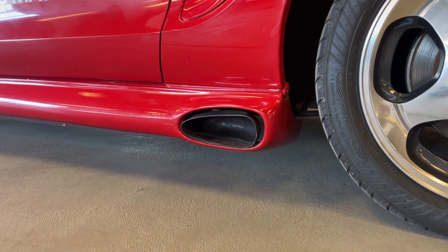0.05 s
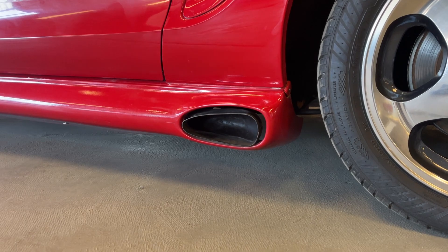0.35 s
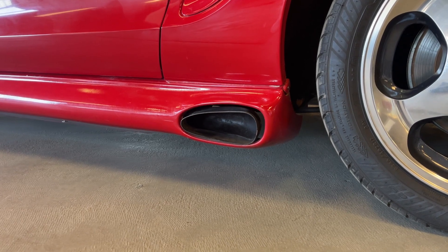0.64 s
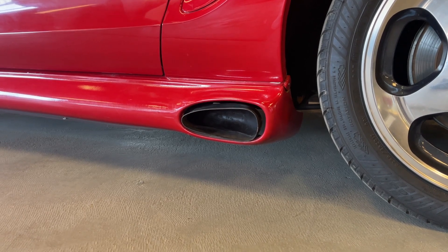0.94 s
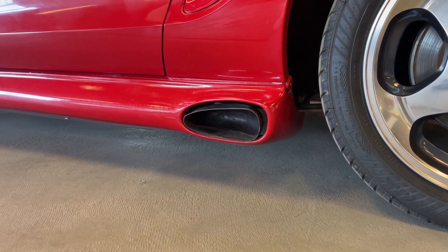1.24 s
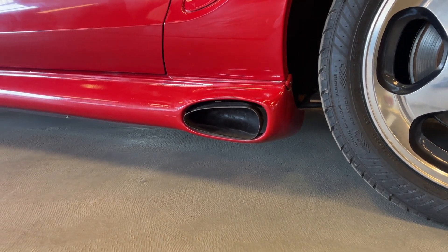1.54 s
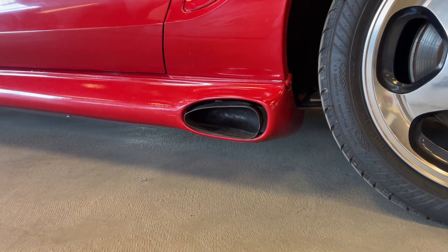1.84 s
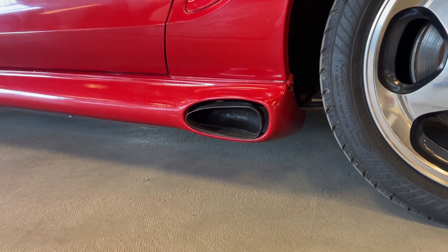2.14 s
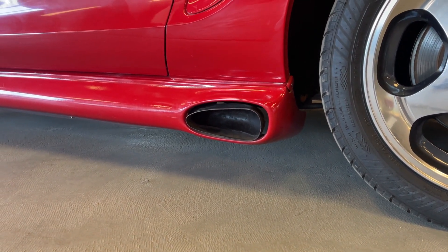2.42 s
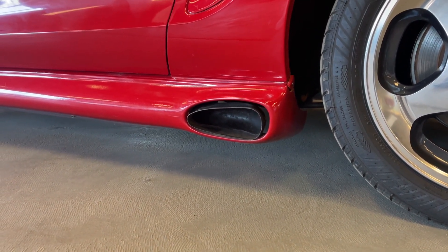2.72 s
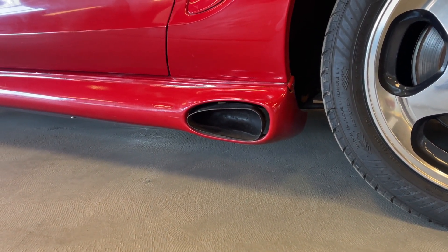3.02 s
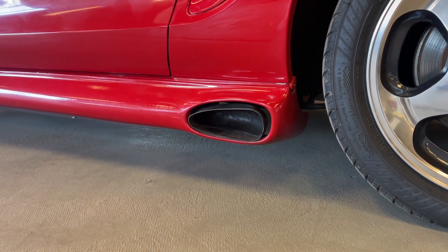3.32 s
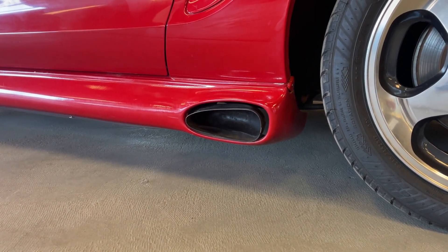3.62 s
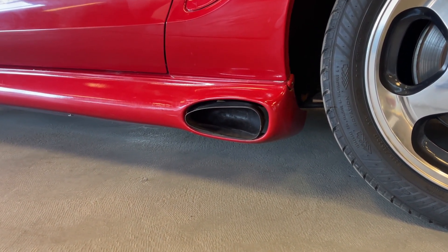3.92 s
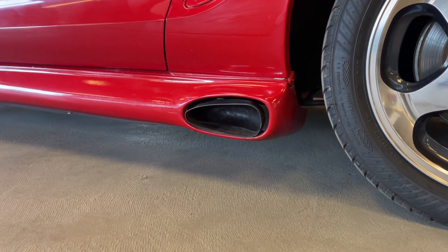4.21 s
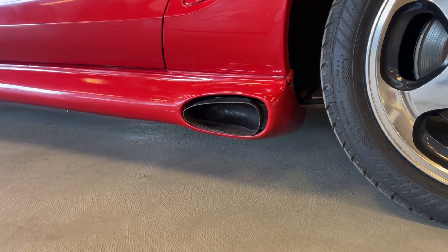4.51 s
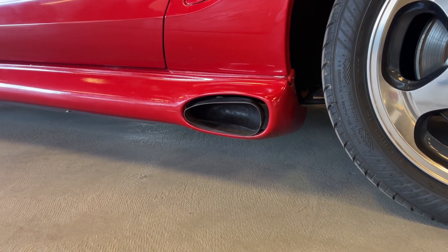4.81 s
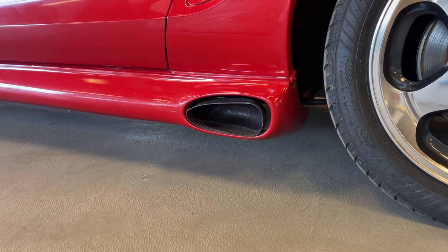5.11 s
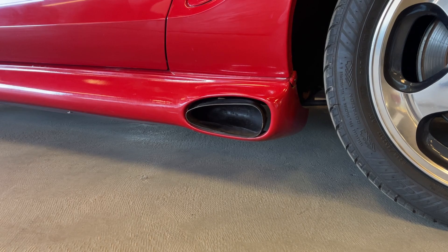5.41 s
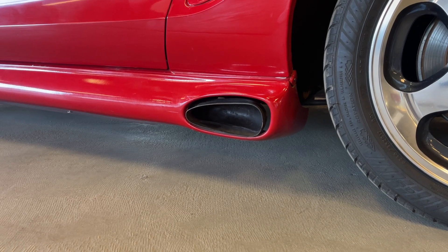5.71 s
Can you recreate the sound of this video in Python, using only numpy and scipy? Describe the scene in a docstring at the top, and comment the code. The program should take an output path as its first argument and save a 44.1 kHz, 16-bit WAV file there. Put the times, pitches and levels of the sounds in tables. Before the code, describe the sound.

An eight-cylinder car engine idles for the whole six seconds, heard close to the side exhaust outlet in a concrete garage. The main sound is a deep, booming burble with an uneven, loping beat, each firing pushing a soft puff of gas through the ringing pipe. The speed wanders only slightly, sagging a little just after 4 seconds and recovering by 5.

Short hollow burps dot the rumble throughout. Late firings add small breathy chuffs at about 0.3, 0.6 and 0.9 seconds, then at 4.3 and 4.6, with the strongest around 5.2 and another at 5.6. A slight dry rasp pulses with the engine and stands out briefly near 2.1 and 5.4 seconds. Well behind the exhaust, the engine bay gives a steady, wide hiss, with light rhythmic valve ticking and rustling and a very faint, high pump whine.

```python
"""Eight-cylinder idle in a concrete garage

Close to the side exhaust outlet, uneven firings make the pipe boom and burble, each with a puff of gas.
Now and then one burns late and chuffs or burps. The lope comes from the unequal cylinders.
Behind it the engine bay hisses, the valves tick and rustle and a pump whines faintly."""
import sys
import numpy as np
from scipy import signal
from scipy.fft import rfft, irfft
from scipy.io import wavfile
from scipy.ndimage import uniform_filter1d

SR = 44100
rng = np.random.default_rng(int(sys.argv[2]) if len(sys.argv) > 2 else 0)


def transcribe(signal):
    """Save signal, clipped to [-1, 1], as a 16-bit WAV file at the path in sys.argv[1]."""
    frames = np.atleast_2d(signal).T
    limited = np.clip(frames, -1, 1)
    pcm = np.round(limited * 32767).astype(np.int16)
    wavfile.write(sys.argv[1], SR, pcm)


N = 262395
TIME = np.arange(N) / SR
HZ = np.maximum(np.arange(N // 2 + 1) * SR / N, 1e-3)

# the idle hunting slowly around its set speed: time_s, crank_rpm
IDLE_SPEED = [(0.0, 786.5), (0.21, 776.9), (0.41, 775.4), (0.62, 778), (0.82, 781.9), (1.03, 767.9),
              (1.23, 771), (1.44, 772.8), (1.64, 800), (1.85, 781.9), (2.05, 791.6), (2.26, 761),
              (2.46, 785.7), (2.67, 780.7), (2.87, 790.4), (3.08, 779.3), (3.28, 798.8), (3.49, 795.5),
              (3.69, 772.9), (3.9, 774.6), (4.1, 731.3), (4.31, 774.9), (4.51, 755.4), (4.72, 792.2),
              (4.92, 799.3), (5.13, 810.2), (5.33, 781.8), (5.54, 806.5), (5.74, 803.7), (5.95, 762.4)]
# each firing's pressure pulse, push on the silencer, slap on the tail pipe and puff of gas:
# place_cycles, pulse_db, push_db, slap_db, puff_db
CYLINDERS = [(.062, -12, -10, -1.5, -14.5), (.201, 9, 1, 6.5, 1), (.34, 10.5, 12.5, -0.5, -4),
             (.438, -48, -35, 6.5, -3.5), (0.576, 3, -37, 1, -1.5), (.713, 7.5, 17.5, -37, -3.5),
             (0.821, 8.5, 2.5, -7, -1.5), (.958, 7.5, 6, 2.5, -2)]
# strong burns swell the boom, weak ones drop out of it and finish in the pipe: time_s, change_db
ODD_BURNS = [(.125, 2), (.195, 1), (.355, 1.5), (.515, -3), (.665, 1), (1.125, 3), (1.28, 1), (1.435, 1.5),
             (1.617, 0), (1.675, -7), (1.745, -3), (2.2, -1.5), (2.69, -8), (2.745, -4), (3.2, 1),
             (3.275, -5), (3.82, -4), (4.005, -7.5), (4.115, -6), (4.555, -6), (4.825, 0.5), (4.98, 0.5),
             (5.075, 4), (5.135, -8.5), (5.175, -6), (5.265, 4.5), (5.56, 1), (5.88, -8)]
# low resonances of the whole exhaust: pitch_hz, width_hz, level_db
BOOM_MODES = [(46.3, 4.6, -1), (82, 4.2, -4.5), (110.7, 8.4, 2.5), (127.9, 27.5, 4.5), (146.7, 21.4, 4),
              (138.87, 6.7, -2.5)]
# unsteady outflow under the boom: frequency_hz, density_db
RUMBLE_COLOUR = [(20, -32), (30, -15), (42, -24), (62, 10.5), (80, -10), (95, 4), (135, 1), (175, -9),
                 (200, 0.5), (240, -34), (400, -42.5)]
# hum of the silencer chamber: pitch_hz, width_hz, level_db
SILENCER_MODES = [(196, 42.2, -11), (214.4, 24.2, -9.5)]
# overtones of the tail pipe: pitch_hz, width_hz, level_db
PIPE_MODES = [(288.6, 11.8, -9.5), (290.2, 12.5, -8.5), (370, 17, -14.5), (409.1, 7.4, -6.5),
              (700, 18, -12), (725.4, 18.5, -13.5), (783, 7.6, -9.5), (858.4, 9.4, -14), (1004, 17.6, -14),
              (1093.7, 13.2, -9.5), (1262, 9.8, -16), (1342, 25, -19.5), (1395, 9.3, -13), (1669, 7.8, -16),
              (2243, 13, -25), (2318, 18, -15.5)]
# slugs of gas that bark in every cycle: place_cycles, half_length_s, pitch_hz, relative_db
BARKS = [(0.22, 0.0041, 384, -27), (.32, 0.0034, 363, -23), (.655, 0.0096, 405, -26.5),
         (.67, 0.0036, 760, -33.5), (0.28, 0.012, 715, -33.5), (0.064, 0.0096, 713, -34.5),
         (.735, 0.0025, 364, -24), (.87, 0.0072, 391, -27.5), (.94, 0.0028, 398, -26),
         (.08, 0.0047, 1000, -40), (0.84, 0.0033, 1000, -38), (0.0787, 0.0057, 416, -31)]
# the loudest single slugs of gas: time_s, half_length_s, pitch_hz, relative_db
BURPS = [(0.256, 0.0041, 741, -24), (0.255, 0.0062, 390, -19), (0.297, 0.0049, 395, -18.5),
         (0.323, 0.012, 713, -26), (0.414, 0.0043, 744, -23), (0.567, 0.0041, 759, -30),
         (0.571, 0.0079, 398, -21.5), (0.718, 0.0035, 716, -27.9), (1.027, 0.0079, 390, -25),
         (1.029, 0.0048, 760, -24), (1.131, 0.0071, 719, -24), (1.184, 0.0061, 766, -22),
         (1.949, 0.0088, 402, -27), (2.413, 0.0043, 751, -22), (2.599, 0.01, 416, -22),
         (2.825, 0.0076, 390, -24.1), (3.029, 0.0083, 400, -22), (3.328, 0.01, 413, -25),
         (3.357, 0.0069, 412, -23), (3.386, 0.0066, 730, -27), (3.424, 0.0053, 742, -31),
         (3.482, 0.0085, 404, -24), (3.634, 0.012, 404, -22.5), (4.041, 0.006, 707, -24),
         (4.106, 0.0071, 383, -28), (4.265, 0.0048, 780, -21.5), (4.323, 0.0038, 725, -36),
         (4.419, 0.0083, 392, -21), (4.481, 0.0047, 723, -26), (4.584, 0.0052, 780, -24),
         (4.661, 0.0066, 717, -25), (4.929, 0.0096, 290, -22), (5.03, 0.0038, 716, -25),
         (5.166, 0.012, 287, -26), (5.181, 0.005, 404, -19), (5.182, 0.0073, 745, -25),
         (5.429, 0.0096, 285, -23)]
# late, rough burns: time_s, relative_db
CHUFFS = [(0.256, -14), (0.565, -15), (0.876, -14), (1.185, -25), (3.324, -23), (3.629, -29), (4.262, -16),
          (4.581, -17), (5.143, -7), (5.181, -15), (5.632, -16)]
# turbulence at the outlet: frequency_hz, density_db
JET_COLOUR = [(150, -8.5), (260, 13), (450, 9.5), (800, 7.5), (1200, -1), (2000, -27), (3000, -10),
              (6000, -44), (12000, -47)]
# rasps that stand out: time_s, level_db
RASP_ACCENTS = [(.433, -48), (.748, -47), (1.675, -45), (2.124, -40), (3.357, -43), (4.831, -43),
                (5.36, -36)]
# dry midrange of a rasp: frequency_hz, density_db
RASP_COLOUR = [(800, -24), (1100, 2), (1380, -6), (1600, -4), (2200, -32), (4000, -50)]
# steady hiss of the engine bay: frequency_hz, density_db
BAY_COLOUR = [(300, -30), (900, -2), (2000, 9), (2700, 1), (3600, -2), (5200, 1), (7200, -2.5), (8600, 2),
              (9600, 0.5), (10500, 6), (11300, -2), (12400, -24)]
# bursts of rustle from the valve gear: place_cycles, width_cycles, hiss_db, ring_db
VALVE_RUSTLES = [(0.413, 0.015, -5, -9), (0.504, 0.012, 1.5, -13), (0.562, 0.024, 2, 2),
                 (0.74, 0.054, -1.5, -0.9), (0.32, 0.13, -6.5, -9.5)]
# dull hiss of the valve gear: frequency_hz, density_db
VALVE_HISS = [(1500, 11), (3000, 6), (4200, 8.5), (4700, 3.5), (5300, 4.5), (6500, 7), (9000, -8),
              (12500, -6)]
# bright ring of the valve gear: frequency_hz, density_db
VALVE_RING = [(5000, -6.5), (7400, -6.5), (8200, 1.5), (8800, 4), (9600, -4.5), (10500, 3), (11300, -9),
              (12500, -35)]
# soft rattles in the valve gear: time_s, level_db
RATTLES = [(4.70, -45), (5.40, -49)]
# where the first valve seats, and the accent of each of the eight: place_cycles, accent_db
TAPPET_PLACE, TAPPETS_DB = .075, [4, 3, 2, 5, 2, -3, -5, -10]
# how alike the diffuse sound is on both sides: frequency_hz, likeness_ratio
STEREO_LIKENESS = [(150, 0.94), (400, 0.95), (600, 0.75), (1100, 0.74), (1700, 0.16), (2500, 0.068),
                   (4000, 0.76), (5400, 0.3), (7000, .55), (8400, 0.93), (12000, 1)]
# balance across the spectrum: frequency_hz, left_over_right_db
STEREO_TILT = [(60, 1.5), (130, -1.5), (220, 2.5), (300, -0.5), (470, 0.5), (900, 1.5), (1300, 4),
               (1900, 1), (2300, 4), (7000, 3), (8600, 0.8), (12000, -0.5)]
# phase between the sides: frequency_hz, left_lead_rad
STEREO_LEAD = [(60, .05), (140, .11), (600, .25), (2000, .1), (3200, .8), (6500, .4), (7500, 1.1),
               (8600, 0), (9400, -1.3), (10300, -3.1), (11700, -6.2)]


def firings(cycles, jitter_s=0.00024, uneven_db=0.95, stumble_s=0.011, afterburn=0.39):
    """Pulses, pushes, slaps and puffs of all cylinders; a weak burn trades pulse for push and slap."""
    place, *levels_db = np.transpose(CYLINDERS)
    cycle, cylinder = np.divmod(np.arange(int(cycles[-1] + 1) * len(place)), len(place))
    *scatter, timing = rng.standard_normal((len(cycle), 5)).T
    times = time_of(cycle + place[cylinder], cycles) + jitter_s * timing
    odd_db = sum(db * bell(TIME - s, stumble_s) for s, db in ODD_BURNS)
    changes_db = [odd_db, -afterburn * odd_db, -afterburn * odd_db, np.zeros(N)]
    return [clicks(times, from_db(db[cylinder] + np.interp(times, TIME, change) + uneven_db * chance))
            for db, change, chance in zip(levels_db, changes_db, scatter)]


def boom(pulses, edge_hz=900, rumble_db=-12, drone_db=-12, drone_hz=138.6, drone_width_hz=11):
    """Rounded pulses ring the low pipe resonances, and churning gas keeps the main one droning."""
    rounded = 1 / (1 + 1j * HZ / edge_hz) ** 2
    open_end = high_pass(39.4, order=4)  # the mouth radiates no deep bass
    ringing = filtered(pulses, rounded * resonances(BOOM_MODES) * open_end)
    rumble = filtered(noise(RUMBLE_COLOUR)[0], high_pass(32, order=7))
    drone = filtered(rng.standard_normal(N), resonances([(drone_hz, drone_width_hz, 0)]) ** 2)
    flow = np.sqrt(uniform_filter1d(ringing ** 2, size=900))  # the drone swells with each chug
    return ringing + from_db(rumble_db) * rumble + from_db(drone_db) * flow * drone


def chug(pushes, slaps, silencer_db=-35, slap_db=-35, slap_edge_hz=380):
    """Each firing makes the silencer hum and slaps the tail pipe softly."""
    hum = filtered(pushes, resonances(SILENCER_MODES))
    soft_slaps = signal.sosfilt(signal.butter(3, slap_edge_hz, fs=SR, output="sos"), slaps + 1e-18)
    return from_db(silencer_db) * hum + from_db(slap_db) * tail_pipe(soft_slaps)


def barks(cycles, jitter_s=0.00046, pitch_scatter=0.021, trim_db=-1.8):
    """Slugs of gas bark at the outlet in every cycle, each a little off in time and pitch."""
    out = np.zeros(N)
    for place, half_length_s, hz, db in BARKS:
        for cycle, (late, sharp) in enumerate(rng.standard_normal((int(cycles[-1] + 1), 2))):
            s = time_of(cycle + place, cycles) + jitter_s * late
            add_slug(out, s, half_length_s, hz * (1 + pitch_scatter * sharp), db + trim_db)
    return out


def burps(trim_db=-1, pivot_hz=394, octave_drop_db=3.5):
    """Big single slugs of gas burp out; the higher ones are softer."""
    out = np.zeros(N)
    for s, half_length_s, hz, db in BURPS:
        add_slug(out, s, half_length_s, hz, db + trim_db - octave_drop_db * np.log2(hz / pivot_hz))
    return out


def add_slug(out, s, half_length_s, hz, db):
    """Add one slug of gas: a short hollow note that swells and fades around time s."""
    near = slice(*np.searchsorted(TIME, [s - .03, s + .03]))
    t = TIME[near] - s
    out[near] += from_db(db) * bell(t, half_length_s) * np.sin(2 * np.pi * hz * t)


def gas_rush(puffs, chuff_boost_db=16, chuff_lead_s=0.0026, puff_lag_s=.004):
    """Each puff blows turbulence through the tail pipe and out of its mouth; late burns chuff inside."""
    s, db = np.transpose(CHUFFS)
    late_burns = clicks(s - chuff_lead_s, from_db(db + chuff_boost_db))
    chuff_power = swell(late_burns, rise_s=0.0037) ** 2
    puffs = np.roll(puffs, int(puff_lag_s * SR))  # the gas trails its pressure pulse
    puff_power = swell(puffs, rise_s=0.0066) ** 2
    # both surges ride on a steady flow
    inside = np.sqrt(0.36 + puff_power + chuff_power) * rng.standard_normal((2, N))
    return tail_pipe(inside) + rms_one(np.sqrt(0.69 + puff_power) * noise(JET_COLOUR))


def tail_pipe(x, loss_hz=1900):
    """The tail pipe rings with its overtones and swallows the treble."""
    overtones = resonances(PIPE_MODES, sign=1)
    wall_loss = 1 / (1 + (1j * HZ / loss_hz) ** 2 + 1j * np.sqrt(2) * HZ / loss_hz)
    return hot_gas_waver(filtered(x, overtones * wall_loss * high_pass(290, order=6)))


def hot_gas_waver(x, wander_s=.00022, step_s=.07):
    """Surges of hot gas change the travel time through the pipe and bend its tuning."""
    steps = int(TIME[-1] / step_s) + 3
    lag_s = signal.resample(wander_s * rng.standard_normal(steps), N)
    return np.apply_along_axis(lambda side: np.interp(TIME + lag_s, TIME, side), -1, x)


def rasps(cycles, place_cycles=0.84, width_cycles=0.062, usual_db=-48, accent_width_s=.012):
    """A dry rasp comes once a cycle and now and then stands out."""
    offset = (cycles - place_cycles + .5) % 1 - .5
    usual = from_db(usual_db) * bell(offset, width_cycles)
    return (usual + accents(RASP_ACCENTS, accent_width_s)) * noise(RASP_COLOUR)


def engine_bay(cycles, steady_db=3.5, ring_boost_db=3, uneven_db=1.34):
    """A bed of steady hiss, with bursts of bright rustle at set angles of the camshaft."""
    hiss_power, ring_power = 0, 0
    for place, width, hiss_db, ring_db in VALVE_RUSTLES:
        cycle, within = np.divmod(cycles - place + 1.5, 1)  # each burst peaks at within = .5
        strengths = from_db(uneven_db * rng.standard_normal(int(cycle[-1]) + 1))
        burst = strengths[cycle.astype(int)] ** 2 * bell(within - .5, width)
        hiss_power += burst * from_db(hiss_db) ** 2
        ring_power += burst * from_db(ring_db + ring_boost_db) ** 2
    bed = from_db(steady_db) * noise(BAY_COLOUR)
    return bed + np.sqrt(hiss_power) * noise(VALVE_HISS) + np.sqrt(ring_power) * noise(VALVE_RING)


def tappets(cycles, tick_db=-44, uneven_db=3, decay_s=0.0036, rattle_width_s=.014):
    """The valves tick as they seat, evenly spaced but unequally loud, with a soft rattle or two."""
    count = len(TAPPETS_DB)
    valve = np.arange(int(cycles[-1] + 1) * count)
    times = time_of(valve / count + TAPPET_PLACE, cycles)
    levels_db = tick_db + np.array(TAPPETS_DB)[valve % count] + uneven_db * rng.standard_normal(len(valve))
    hits = clicks(times, from_db(levels_db))
    ticks = signal.lfilter([1], [1, -np.exp(-1 / (decay_s * SR))], hits + 1e-18)
    return (ticks + accents(RATTLES, rattle_width_s)) * noise(VALVE_HISS)


def pump(pitch_hz=1979, whine_db=-55.5, waver_hz=2.22, flutter_db=2):
    """An electric pump keeps its own pitch, whatever the engine does, and wavers slightly."""
    knots_s = np.arange(0, TIME[-1] + .1, .1)
    waver, flutter = in_time(np.column_stack([knots_s, rng.standard_normal((len(knots_s), 2))]))
    phase = 2 * np.pi * np.cumsum(pitch_hz + waver_hz * waver) / SR
    return from_db(whine_db + flutter_db * flutter) * np.sqrt(2) * np.sin(phase)


def underbody(x, echo_db=-19, longest_s=.012, count=10):
    """Short echoes between car floor and concrete ripple the spectrum."""
    delays_s = longest_s * rng.uniform(0.11, 1, count)
    return x + from_db(echo_db) * sum(np.roll(x, int(s * SR), axis=-1) for s in delays_s)


def stereo_spread(direct, diffuse):
    """The hiss spreads wide; level and phase differ between the sides, the left slightly louder."""
    alike = np.clip(over_hz(STEREO_LIKENESS), 0, 1)
    shared, apart = rfft(diffuse)
    sides = np.array([[1], [-1]])
    centre = rfft(direct) + np.sqrt((1 + alike) / 2) * shared
    spread = sides * np.sqrt((1 - alike) / 2) * apart
    balance = from_db(sides * over_hz(STEREO_TILT) / 2)
    lead = np.exp(.5j * sides * over_hz(STEREO_LEAD))
    return irfft((centre + spread) * balance * lead, N)


def from_db(db):
    """Decibels to gain."""
    return 10 ** (np.asarray(db) / 20)


def rms_one(x):
    """Scale to unit rms."""
    return x / np.sqrt(np.mean(x ** 2) + 1e-20)


def bell(offset, width):
    """A smooth bump, 1 at zero offset."""
    return np.exp(-.5 * (offset / width) ** 2)


def accents(rows, width_s):
    """An envelope with one bump for each row of time_s, level_db."""
    return sum(from_db(db) * bell(TIME - s, width_s) for s, db in rows)


def time_of(place, cycles):
    """When the engine reaches a place in its run of cycles; -1 if it never does."""
    return np.interp(place, cycles, TIME, right=-1)


def in_time(rows):
    """Each column of a curve at every sample."""
    s, *columns = np.transpose(rows)
    return [np.interp(TIME, s, column) for column in columns]


def over_hz(points):
    """A curve drawn over log frequency, at every bin."""
    hz, value = np.transpose(points)
    return np.interp(np.log(HZ), np.log(hz), value)


def filtered(x, response):
    """Pass x through a frequency response; rms 1."""
    return rms_one(irfft(rfft(x) * response, N))


def resonances(modes, sign=-1):
    """Response of a pipe: parallel resonances, alternating (sign -1) or alike (sign 1) in polarity."""
    return sum(sign ** k * from_db(db) / (1 + 1j * (HZ ** 2 - hz ** 2) / (HZ * width))
               for k, (hz, width, db) in enumerate(modes))


def high_pass(edge_hz, order):
    """Response of a smooth low cut."""
    return signal.freqs(*signal.butter(order, edge_hz, "high", analog=True), HZ)[1]


def noise(colour):
    """Two unrelated noises of one colour."""
    return filtered(rng.standard_normal((2, N)), from_db(over_hz(colour)))


def clicks(times, sizes):
    """One click of the given size at each time."""
    at = np.round(times * SR).astype(int)
    inside = (at >= 0) & (at < N)
    return np.bincount(at[inside], sizes[inside], N)


def swell(x, rise_s):
    """Each click becomes a puff that peaks at the click's size after rise_s, then dies."""
    pole = np.exp(-1 / (rise_s * SR))
    return signal.lfilter([np.e / (rise_s * SR)], [1, -2 * pole, pole * pole], x + 1e-18)


def scene(boom_db=-17.5, rush_db=-34.5, bay_db=-45.5):
    """Exhaust up front, engine bay behind; the crank speed sets the rhythm of both."""
    rpm, = in_time(IDLE_SPEED)
    cycles = np.cumsum(rpm) / (120 * SR)  # one four-stroke cycle takes two crank turns
    pulses, pushes, slaps, puffs = firings(cycles)
    direct = from_db(boom_db) * boom(pulses) + chug(pushes, slaps) + barks(cycles) + burps() + pump()
    rush = from_db(rush_db) * gas_rush(puffs)
    bay = from_db(bay_db) * underbody(engine_bay(cycles))
    return stereo_spread(direct, diffuse=rush + bay + rasps(cycles) + tappets(cycles))


def record(dry, cutoff_hz=12450):
    """A steep high cut takes off the very top."""
    return signal.sosfilt(signal.ellip(12, .1, 90, cutoff_hz, fs=SR, output="sos"), dry)


dry = scene()
out = record(dry)
transcribe(out)
```